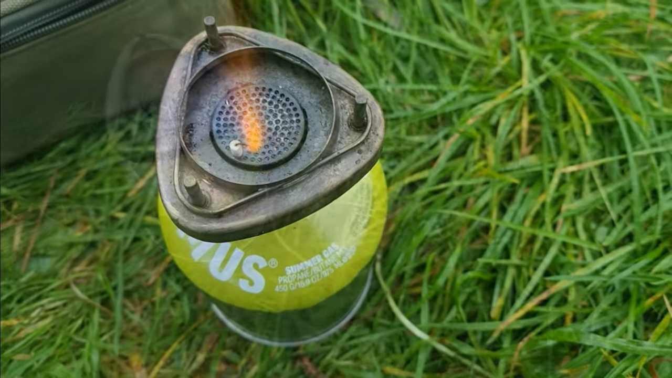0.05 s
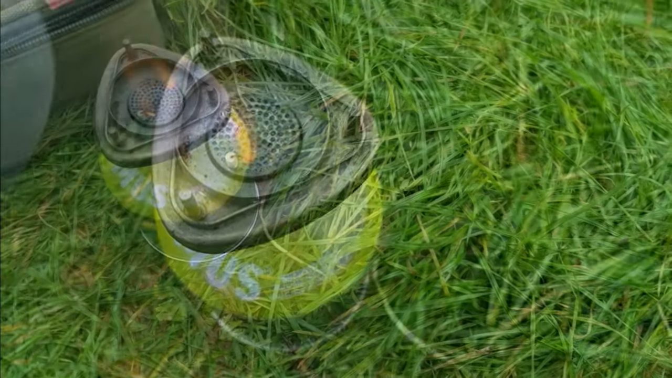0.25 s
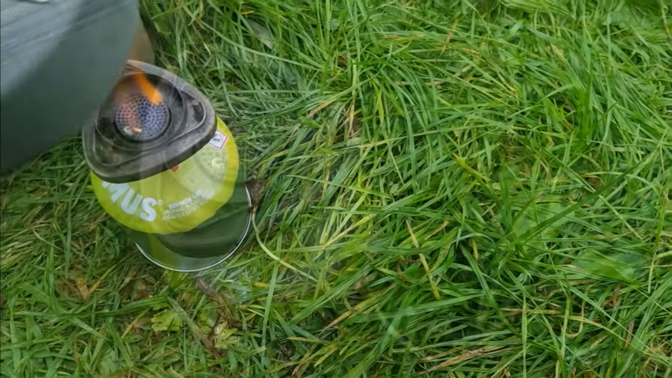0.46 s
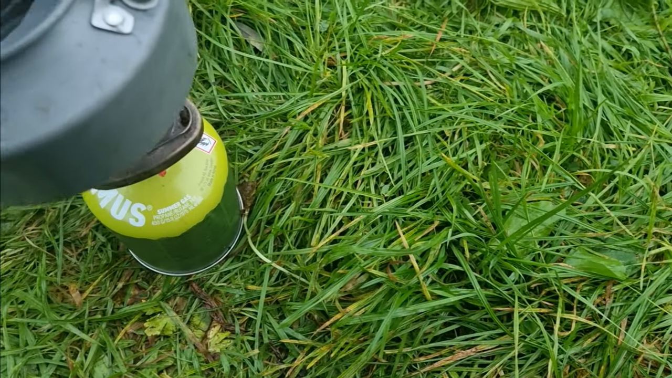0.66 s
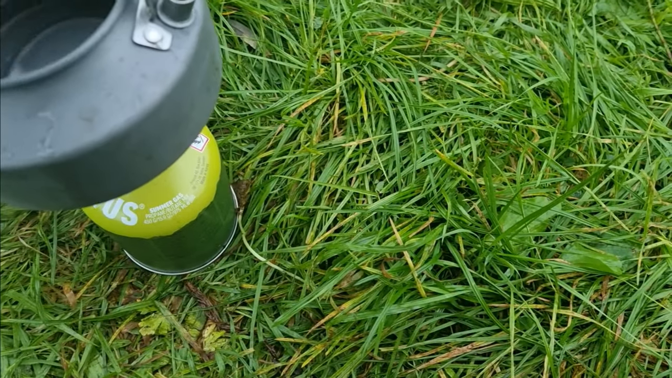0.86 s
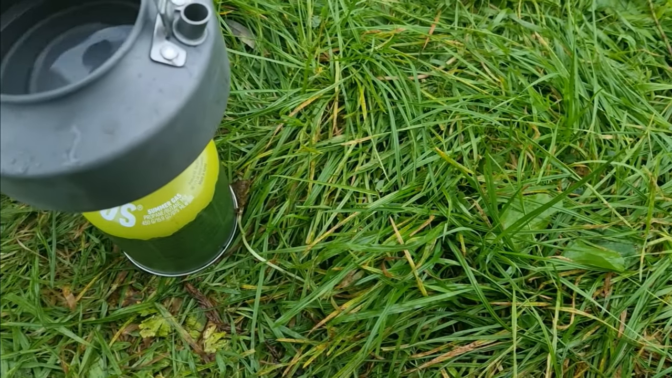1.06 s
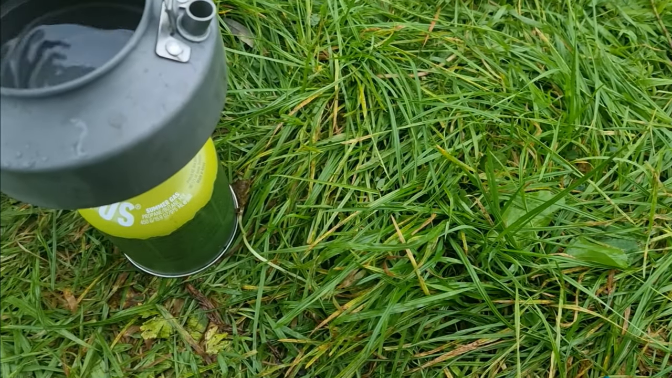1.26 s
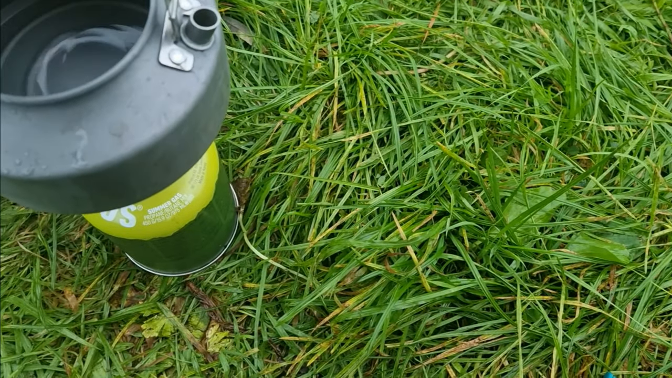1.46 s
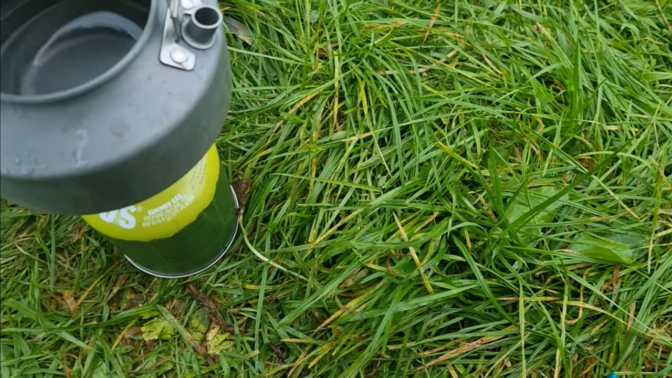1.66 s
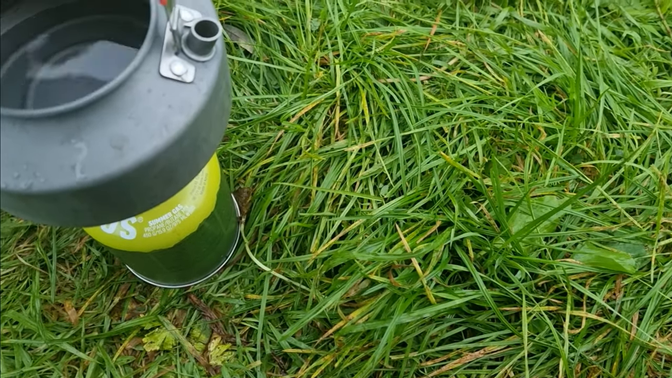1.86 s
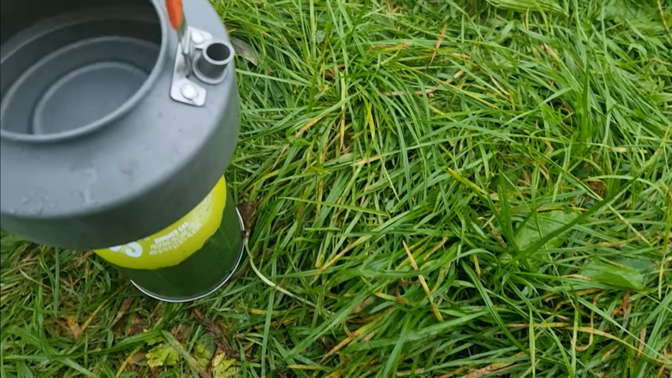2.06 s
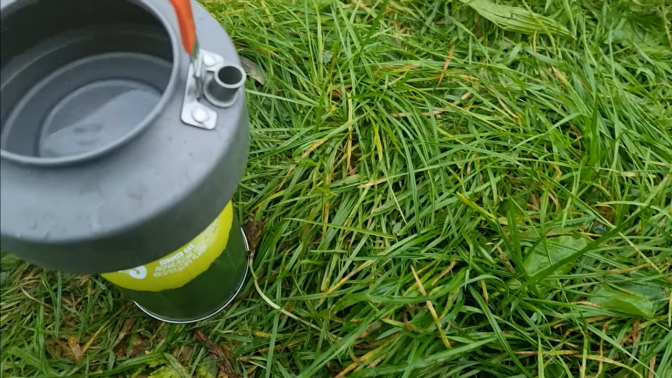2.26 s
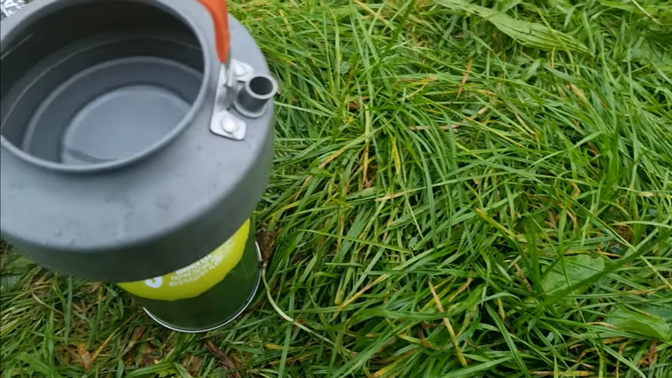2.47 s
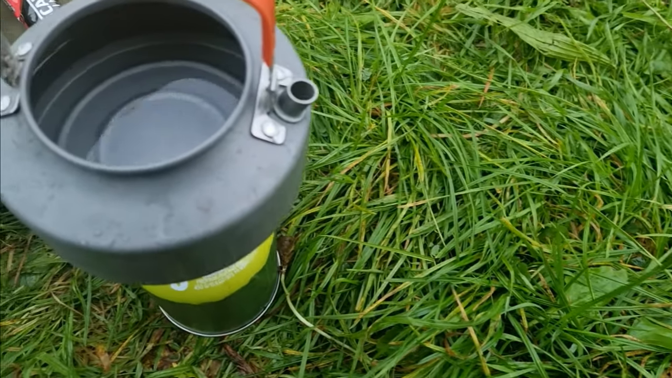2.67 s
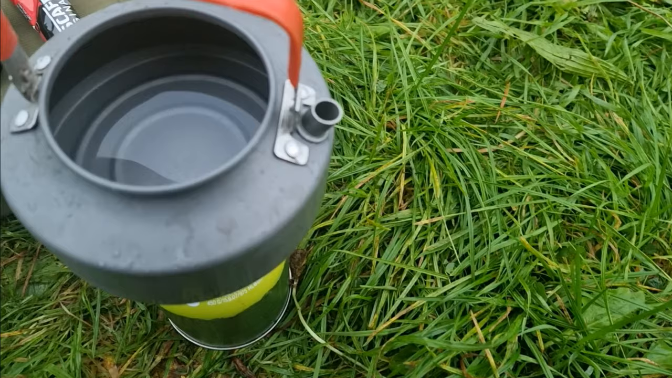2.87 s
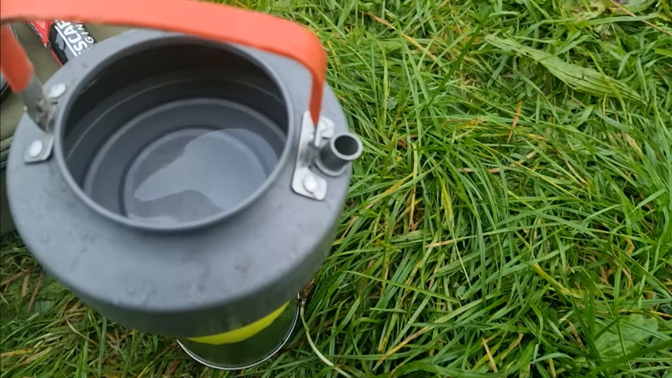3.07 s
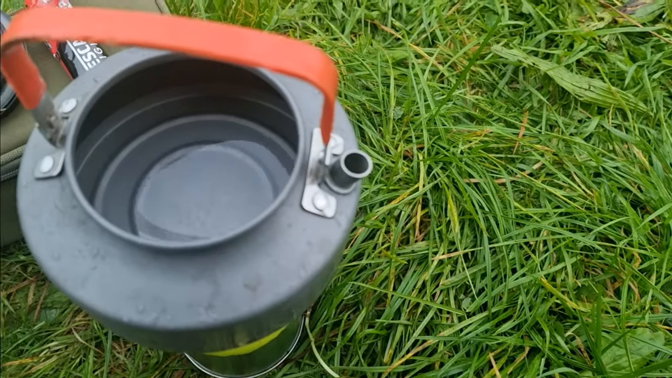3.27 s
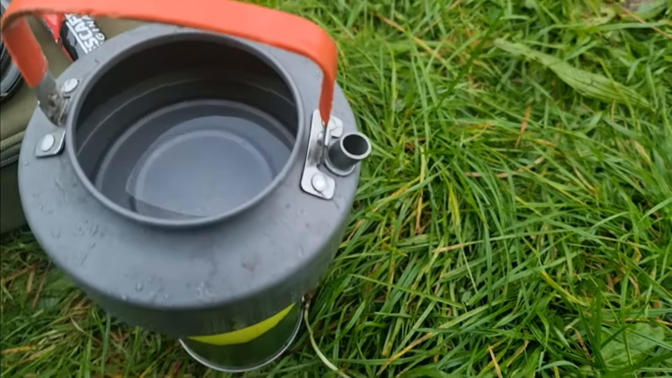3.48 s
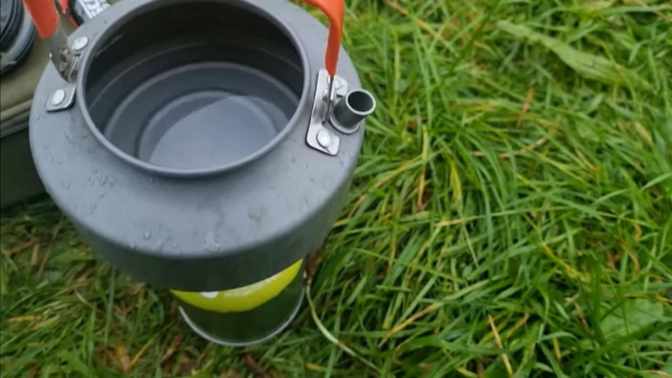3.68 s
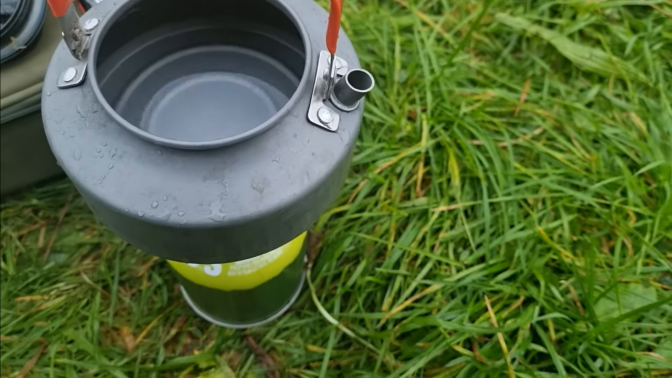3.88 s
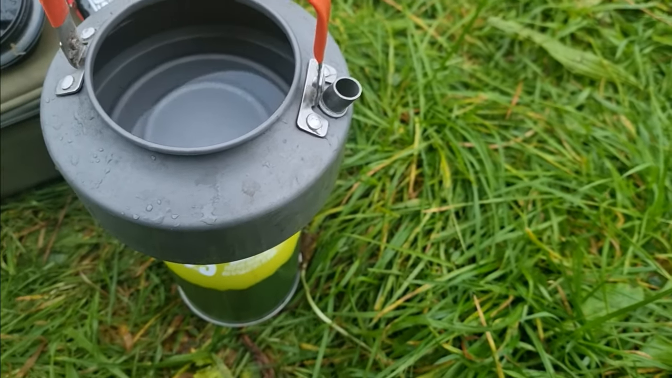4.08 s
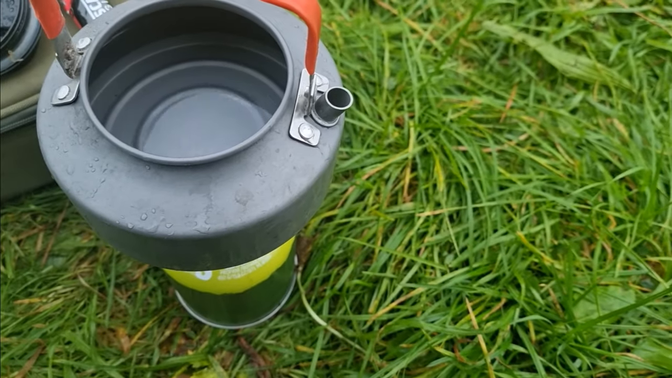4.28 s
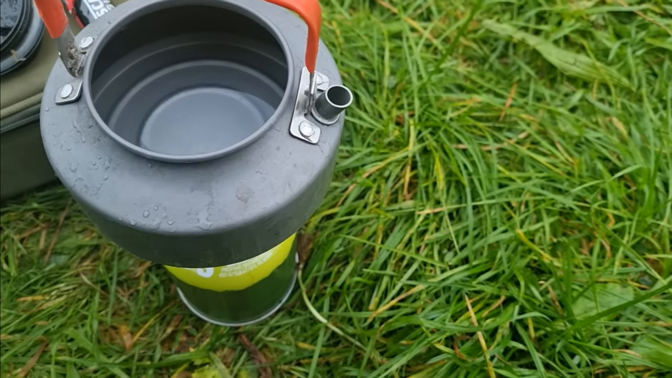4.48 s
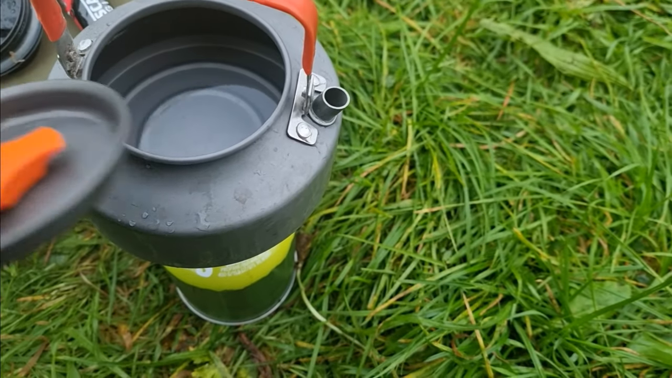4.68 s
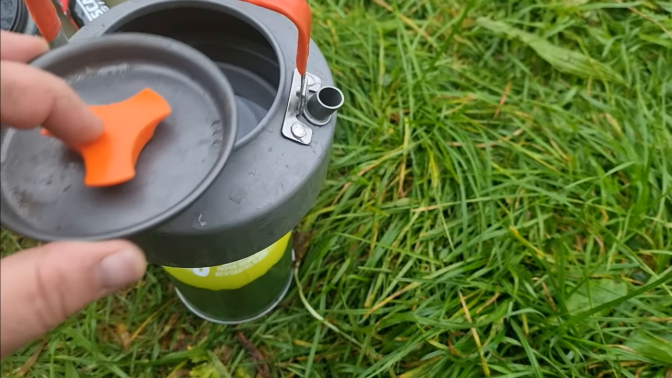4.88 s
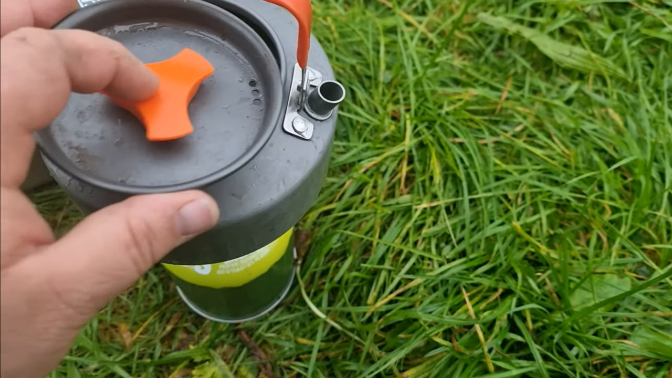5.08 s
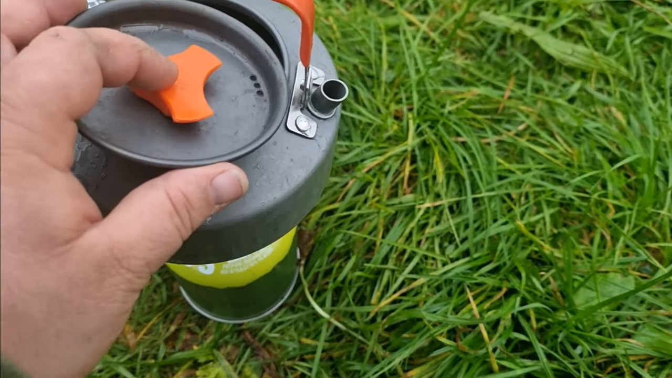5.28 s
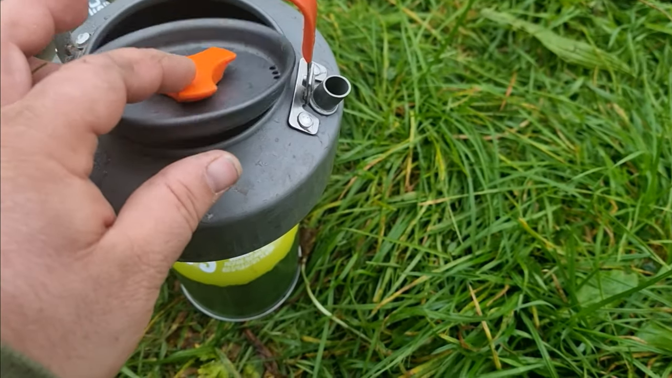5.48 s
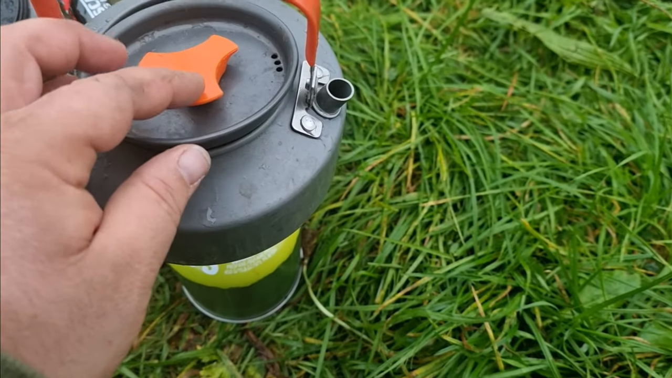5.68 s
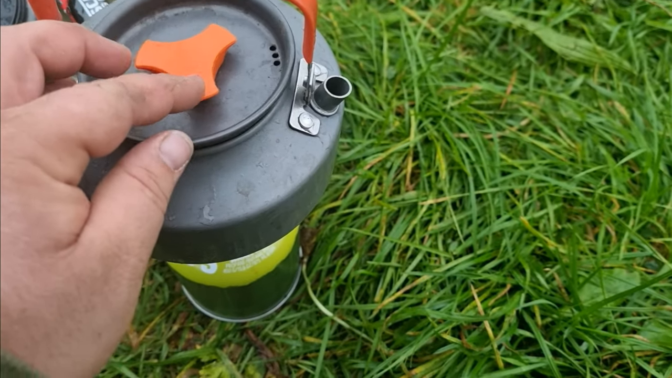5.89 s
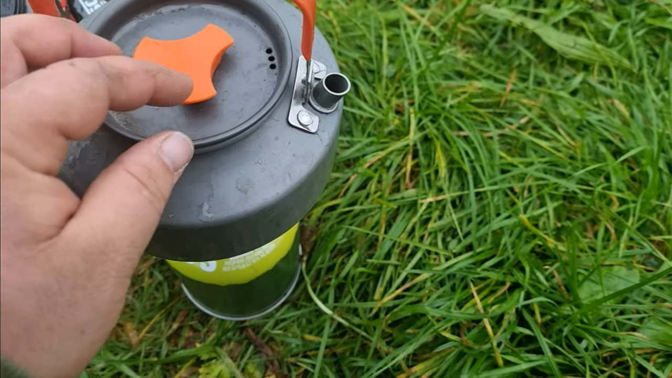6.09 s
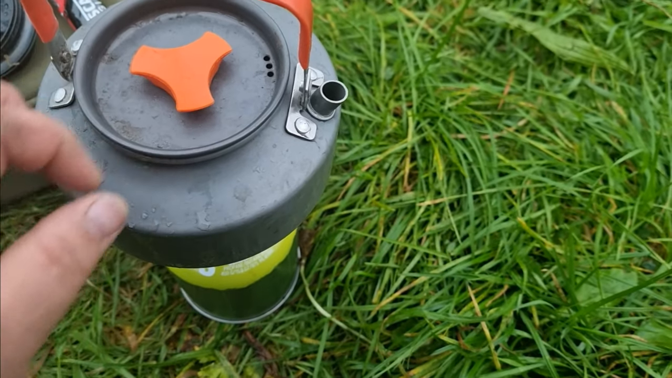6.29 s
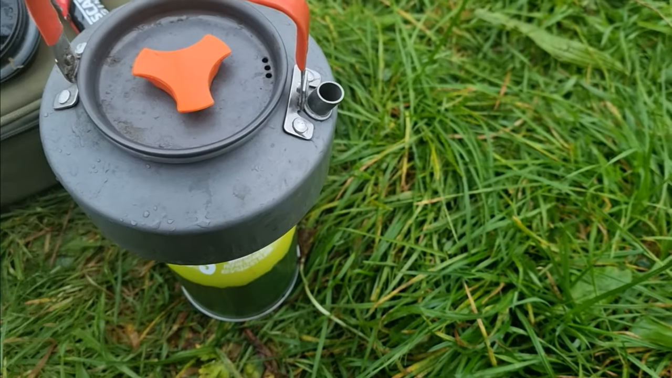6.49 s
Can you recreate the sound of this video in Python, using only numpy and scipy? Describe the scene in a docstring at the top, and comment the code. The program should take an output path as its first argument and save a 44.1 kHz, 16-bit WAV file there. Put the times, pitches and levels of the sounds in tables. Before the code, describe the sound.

A small camping gas stove burns with a steady, airy hiss over a faint low flutter of flame. A metal kettle of water is set on it with a short ringing clunk and nudged into place, and the hiss changes colour as the burner is covered. After a few faint ticks, the thin lid rattles, scrapes round the rim and is pressed home with sharp clacks. It is heard close up, outdoors, without echo.

```python
"""A camping gas stove burns on grass: its turbulent jet hisses through the resonances of the burner
tube, over the low flutter of the flame. A kettle of water is set on the pan supports and nudged into
place; the impacts excite its modes, it screens the hiss, and the warming metal ticks. Later its thin
lid is put on, rattles and rubs round the rim and is pressed home, while the air inside rings lower
as the mouth closes."""
import sys
import numpy as np
from scipy import signal
from scipy.fft import rfft, irfft
from scipy.io import wavfile
from scipy.ndimage import uniform_filter1d

SR = 44100
rng = np.random.default_rng(int(sys.argv[2]) if len(sys.argv) > 2 else 0)


def digitize_waveform(pressure):
    """Quantize a signal to 16-bit integers and store it at the path in sys.argv[1].

    Rows of a 2-D input are taken as channels; values are limited to [-1, 1].
    """
    field = np.atleast_2d(pressure).T
    bounded = np.clip(field, -1, 1)
    quanta = np.round(bounded * 32767).astype(np.int16)
    wavfile.write(sys.argv[1], SR, quanta)


N = 288414
TIME = np.arange(N) / SR
FRAME_S = np.arange(N // 256 + 6) * 256 / SR
BIN_HZ = np.fft.rfftfreq(1024, 1 / SR)
RING_S = np.arange(SR // 2) / SR

# Levels are relative; pan_db is left over right.
# ticks of warming metal: start_s, level_db
WARMING_TICKS = [(3.286, -35), (3.445, -43), (3.577, -47)]
# strokes of the lid along the rim: start_s, end_s, first_db, last_db, pan_db, hoot_db
RIM_STROKES = [(5.256, 5.404, -60, -47, 9, 4), (5.427, 5.484, -39, -36, 8, -1),
               (5.471, 5.557, -16, -21, 3, -4), (5.552, 5.632, -22, -47.5, 8, 0.5),
               (5.865, 5.978, -39, -25.5, 6, -11), (5.96, 6.025, -17.5, -28, 16, -14)]
# the lid strikes the rim: start_s, level_db, treble_db, pan_db
LID_IMPACTS = [(5.2285, -1, -1, 1), (5.24, -10.5, -17.5, 7), (5.4765, 2.5, -2, 3), (5.497, -3, -11, 1),
               (5.502, -5, 3, 14), (5.51, -5.5, 14, 2), (5.5272, -2.5, 6, 15), (5.537, -9, 2, -5),
               (5.547, -4.5, -5, 4.5), (5.568, -19, -9, 4), (5.724, -27, 11, 6), (5.738, -25.5, 8.5, 9),
               (5.783, -22, -15, 8), (5.8847, -7.5, -6.5, 7), (5.966, 0, -12, 8), (5.972, 1.5, -9, 0),
               (5.984, 0, 2, -1), (5.989, -2.5, 2, 6), (6.008, 0, -2, 5.5)]
# damping by the fingers on the lid: time_s, decay_db_per_s
FINGER_DAMPING = [(5.25, 15), (5.6, 38), (5.9, 3), (6.0, 212)]
# the lid closes the kettle's mouth: time_s, closed_fraction
MOUTH_CLOSURE = [(5.38, 0), (5.48, 0.27), (5.53, .4), (5.58, 0.78), (5.78, 0.5), (5.9, 0.83), (5.97, 0.89)]
# the kettle meets the supports: start_s, level_db, scrape_db, pan_db, contact_s, low_modes_db
KETTLE_IMPACTS = [(1.0785, -3.5, 3, 2.5, 0.0023, -1), (1.0823, -11, -12, -31, 0.0022, 6),
                  (1.266, -6.5, -12, -3, 0.004, -33), (1.405, -28.5, -7, -9, 0.0047, -8),
                  (1.425, -18.5, -13, 1, 0.0082, -23)]
# the flame as the listener moves about: time_s, level_db
FLAME_ENVELOPE = [(0, -41.5), (.35, -47.5), (3.7, -48), (4.4, -46), (5.4, -50), (6.54, -52)]
# the jet as the listener draws back: time_s, level_db
JET_ENVELOPE = [(0, -32.5), (.4, -38), (1, -40), (1.4, -40), (3.6, -40), (4.3, -40.5), (4.9, -44),
                (5.12, -40.5)]
# direction of the stove: time_s, pan_db
JET_PAN = [(0, -4.5), (.3, -3), (.65, 8.5), (1.9, 8.5), (3.3, 5.5), (4.4, 5), (4.85, 9.5), (6.2, 10.5),
           (6.54, 7)]
# the kettle screens the burner: time_s, hidden_fraction
SCREENING = [(0, 0.14), (.6, 0.28), (1, 0.43), (1.3, 0.65), (1.85, 0.66), (2.3, 0.9), (3.3, 0.86),
             (3.55, .78), (4.1, 1)]
# the kettle's mouth passes near the listener and hollows the hiss: start_s, end_s, level_db
MOUTH_PASSES = [(0.202, 0.424, 3), (3.99, 4.35, -8), (4.589, 5.3, -14)]

# modes of the struck metal: pitch_hz, level_db, t60_s
LID_PARTIALS = [(1270, -19.5, 0.22), (1540, -28, 0.39), (2015, -16, 0.15), (2210, -34, 0.2),
                (2410, -38, 0.11), (2763, -2.5, 0.11), (2880, -14.5, 0.12), (2795, -6.5, 0.051),
                (3155, -9, 0.12), (3340, -30.5, 0.13), (3370, -15, 0.19), (3800, -31, 0.07),
                (4100, -12, 0.054), (4910, -23.5, 0.14), (5710, -10.5, 0.088), (6970, -24.5, 0.2)]
OPEN_BODY_PARTIALS = [(826, -30, 0.39), (1570, -36, 0.23), (2062, -24, 0.16)]  # the kettle answering the lid, mouth open
SHUT_BODY_PARTIALS = [(320.3, -34.5, 0.28), (362, -33.5, 0.14), (1547, -27.5, 0.17), (2065, -25, 0.15)]  # the same, lid seated
KETTLE_PARTIALS = [(791.7, -2.5, 0.12), (780, -16, 0.27), (818.5, -18, 0.13), (842, -13, .09),
                   (1105, -28, 0.049), (1110, -19.5, 0.13), (1277, -22.5, 0.1), (1600, -34.5, 0.54),
                   (1645, -16, 0.053), (1734, -8, 0.032), (2280, -27, 0.15), (3224, -16.5, 0.15)]  # the kettle on the supports

# resonances driven by noise: centre_hz, width_hz, level_db
RIM_BANDS = [(1480, 320, -11.5), (2040, 85, -5), (2730, 48, 4), (2940, 42, -12), (3110, 110, 2),
             (3370, 120, -6), (3860, 75, -19), (5490, 95, -10)]
CAVITY_BANDS = [(830, 150, 1.5), (1080, 70, -2), (1400, 130, 0.5)]  # air in and around the open kettle
NOZZLE_BANDS = [(6630, 690, -6.5), (6540, 430, -2), (9800, 620, -9)]
BURNER_BANDS = [(1581, 30, -8), (1914, 145, -7), (2527, 310, 3), (2908, 337, 0), (4064, 380, -8),
                (5280, 240, 1.5), (5590, 310, -2.5), (7200, 510, -13)]  # the tube and the gap under the kettle

# noise spectra: frequency_hz, density_db
CLACK_SPECTRUM = [(150, -46), (300, -20), (430, -34), (560, -1.5), (1000, -5.5), (2000, 2), (3000, 4),
                  (4000, -1.5), (4800, -6.5), (5800, -3.5), (7300, -4), (8500, -13.5), (11500, -15.5),
                  (13500, -11.5), (15700, -3)]
SCRAPE_SPECTRUM = [(150, -16.5), (450, -15.5), (750, -10), (1250, 8), (1420, -13.5), (1700, -17.5),
                   (1950, -6.5), (2300, -7.5), (3400, -3.5), (4700, -8.5), (7000, 1.5), (9500, -10),
                   (11500, -10), (15000, -7.5)]
FLAME_SPECTRUM = [(20, -36.5), (33, -17), (42, -7.5), (52, -7.5), (65, 2.5), (85, -3), (120, -8.5),
                  (200, -10), (300, -15.5), (420, -22), (650, -35), (1200, -46)]
BARE_JET_SPECTRUM = [(290, -42), (500, -7), (933, -21.5), (1210, -9), (2290, -7.5), (2610, -1.5),
                     (3290, -14), (3750, -11), (4530, -13.5), (6330, 1.5), (9090, -27), (9630, -31),
                     (10100, -27.5), (14200, -19), (16000, -34.5)]
SCREENED_JET_SPECTRUM = [(400, -27.5), (700, -14), (1100, -23), (1450, -31.5), (1800, -17), (3500, -21.5),
                         (4700, -23), (5300, -10.5), (7600, -9.5), (8300, -19), (9300, -22), (10400, -21),
                         (11500, -34), (12600, -23), (15700, -19.5)]
TICK_SPECTRUM = [(600, -36.5), (1300, 3.0), (3000, -4), (6000, -33)]
WOBBLE_SPECTRUM = [(25, -7), (60, -2.5), (200, -68)]
ROUGHNESS_SPECTRUM = [(200, -2), (900, -60)]
FLUTTER_SPECTRUM = [(3, -11), (12, -8.5), (40, -30.0), (200, -100)]

# likeness of left and right: frequency_hz, correlation
FLAME_COHERENCE = [(60, 0.89), (130, .9), (290, 0.68), (640, 0.075)]
BURST_COHERENCE = [(300, 0.6), (650, 0.24), (1300, 0.14), (3100, 0.1), (6000, 0.016)]
RUB_COHERENCE = [(600, 0.6), (1500, 0.21), (3100, 0.24), (6000, .05)]
JET_COHERENCE = [(1400, 0.034), (2700, 0.79), (5400, 0.25), (9000, 0.065)]
# acoustic shadow on the far side, deepest in the middle treble: frequency_hz, pan_factor
SHADOW = [(700, 0.036), (1400, 0.228), (2500, 1.23), (4000, 0.52), (5300, 1.05), (6500, 1.3),
          (7500, .5), (15000, .25)]


def gain_of(db):
    """Amplitude ratio of a level in decibels."""
    return 10 ** (np.asarray(db) / 20)


def unit_rms(x):
    """Normalisation to unit power."""
    return x / np.sqrt(np.mean(x ** 2) + 1e-20)


def at_hz(points, hz):
    """Linear interpolation over log frequency."""
    frequencies, values = np.transpose(points)
    return np.interp(np.log(hz + 1), np.log(frequencies), values)


def at_time(points, t):
    """Linear interpolation over time."""
    return np.interp(t, *np.transpose(points))


def pan(pan_db):
    """Constant-power panning: left and right gains."""
    pair = gain_of([pan_db / 2, -pan_db / 2]).reshape(2, -1)
    return pair / np.sqrt(np.mean(pair ** 2, axis=0))


def gate(t, start, end, fade_s):
    """Raised-cosine window: one from start to end, fading outside."""
    outside = np.clip(np.maximum(start - t, t - end) / fade_s, 0, 1)
    return np.cos(np.pi / 2 * outside) ** 2


def add(mix, start_s, sound):
    """Superposition of a stereo sound on the mix."""
    part = mix[:, round(start_s * SR):][:, :sound.shape[1]]
    part += sound[:, :part.shape[1]]


def noise(spectrum, coherence, size, treble_db=0):
    """Partially coherent stereo noise with a given spectrum and a treble shelf."""
    hz = np.fft.rfftfreq(size, 1 / SR)
    left, independent = rfft(rng.standard_normal((2, size)))
    likeness = at_hz(coherence, hz)
    right = likeness * left + np.sqrt(1 - likeness ** 2) * independent
    shelf = gain_of(treble_db * hz ** 2 / (hz ** 2 + 4000 ** 2))
    shape = unit_rms(gain_of(at_hz(spectrum, hz))) * shelf
    return irfft(np.array([left, right]) * shape, size)


def resonance_power(bands):
    """Power response of steep resonances, summed incoherently."""
    return sum(gain_of(db) ** 2 / (1 + ((BIN_HZ - hz) / (0.67 * width)) ** 2) ** 2
               for hz, width, db in bands)


def ring(modes, scatter_db, spread_hz, detune):
    """Damped free vibration; weight, tuning and left-right phase scatter more in the high modes."""
    hz, db, t60 = np.transpose(modes)[:, :, None]
    weight, phase, shift = rng.standard_normal((3, 2, len(modes), 1))
    spread = np.minimum((hz / spread_hz) ** 2, 2)
    waves = np.sin(2 * np.pi * hz * (1 + detune * spread * shift[0]) * RING_S + phase * spread)
    return np.sum(gain_of(db + scatter_db * weight * spread / 2 - 60 * RING_S / t60) * waves, axis=1)


def burst(spectrum, rise_s, t60_s, treble_db):
    """Modal overlap: the dense, brief modes of thin metal merge into noise whose top dies first."""
    crowd = noise(spectrum, BURST_COHERENCE, len(RING_S), treble_db) * (1 - np.exp(-RING_S / rise_s))
    top = signal.sosfiltfilt(signal.butter(2, 6500, "high", fs=SR, output="sos"), crowd)
    decay = gain_of(-60 * RING_S / t60_s)
    return (crowd - top) * decay + top * decay ** 2.1


def ticks():
    """Thermal expansion: the warming metal gives small dull ticks."""
    out = np.zeros((2, N))
    for start_s, db in WARMING_TICKS:
        add(out, start_s, gain_of(db) * burst(TICK_SPECTRUM, rise_s=0.00025, t60_s=0.025, treble_db=-5))
    return out


def cavity_tone(t, open_hz=822, shut_hz=547.6):
    """Helmholtz resonance: the air in the kettle rings lower as the mouth narrows."""
    pitch_hz = open_hz + (shut_hz - open_hz) * at_time(MOUTH_CLOSURE, t)
    return np.sin(2 * np.pi * np.cumsum(pitch_hz) / SR)


def lid_friction(grit_db=-16, rough_db=-3.0):
    """Uneven sliding friction drives the lid's resonances, with a hoot of the enclosed air below."""
    power = resonance_power(RIM_BANDS) + gain_of(grit_db + at_hz(CLACK_SPECTRUM, BIN_HZ)) ** 2
    rub = noise(np.column_stack([BIN_HZ + 1, 10 * np.log10(power)]), RUB_COHERENCE, N)
    hoot = noise(WOBBLE_SPECTRUM, RUB_COHERENCE, N)[0] * cavity_tone(TIME)
    rub *= gain_of(rough_db * noise(ROUGHNESS_SPECTRUM, RUB_COHERENCE, N)[0])
    out = np.zeros((2, N))
    for start_s, end_s, first_db, last_db, pan_db, hoot_db in RIM_STROKES:
        span = slice(round(start_s * SR), round(end_s * SR))
        stroke = rub[:, span] * pan(pan_db) + gain_of(hoot_db) * hoot[span]
        size = stroke.shape[1]
        envelope = gain_of(np.linspace(first_db, last_db, size)) * signal.windows.tukey(size, .2)
        add(out, start_s, stroke * envelope)
    return out


def lid(ring_db=-14, snap_db=-5, clack_db=-9, tail_db=-25, air_db=-12, air_rise_s=0.0042,
        air_t60_s=0.045):
    """Impulse excitation: each blow rings lid, kettle and air; the fingers damp the lid and the puff."""
    out = np.zeros((2, N))
    for start_s, db, treble_db, pan_db in LID_IMPACTS:
        damping = gain_of(-np.maximum(at_time(FINGER_DAMPING, start_s), 0) * RING_S)
        shut = at_time(MOUTH_CLOSURE, start_s)
        metal = gain_of(ring_db) * ring(LID_PARTIALS, scatter_db=6.0, spread_hz=1970, detune=0.0018)
        snap = gain_of(snap_db) * burst(CLACK_SPECTRUM, rise_s=.0001, t60_s=.008, treble_db=treble_db + 4)
        clack = gain_of(clack_db) * burst(CLACK_SPECTRUM, rise_s=0.0014, t60_s=0.08, treble_db=treble_db)
        tail = gain_of(tail_db) * burst(CLACK_SPECTRUM, rise_s=0.0022, t60_s=0.29, treble_db=-12)
        body = sum(share ** 4 * ring(modes, scatter_db=-4, spread_hz=2440, detune=0.0025)
                   for share, modes in [(1 - shut, OPEN_BODY_PARTIALS), (shut, SHUT_BODY_PARTIALS)])
        puff_db = air_db + 0.82 * db  # the puff grows more slowly than the blow
        puff = gain_of(puff_db - 60 * RING_S / air_t60_s) * (1 - np.exp(-RING_S / air_rise_s))
        air = damping * puff * cavity_tone(start_s + RING_S)
        strike = damping * pan(pan_db) * (metal + snap + clack + tail)
        add(out, start_s, gain_of(db) * (strike + body) + air)
    return out


def kettle(scrape_db=-9, treble_per_db=0.18, cutoff_cycles=11.0):
    """Contact time limits bandwidth: long contacts ring the high modes less; hard ones scrape brighter."""
    out = np.zeros((2, N))
    hz, mode_db, t60 = np.transpose(KETTLE_PARTIALS)
    is_base = hz < 810  # the loaded base rings less once it rests on the supports
    for start_s, db, grit_db, pan_db, contact_s, low_db in KETTLE_IMPACTS:
        rolloff_db = 10 * np.log10(1 + (hz * contact_s / cutoff_cycles) ** 4)
        modes = np.column_stack([hz, mode_db + low_db * is_base - rolloff_db, t60])
        body = ring(modes, scatter_db=0.0, spread_hz=1890, detune=0.00181)
        body *= 1 - np.exp(-RING_S / contact_s)
        scrape = burst(SCRAPE_SPECTRUM, rise_s=contact_s / 2, t60_s=0.11, treble_db=treble_per_db * db)
        add(out, start_s, gain_of(db) * pan(pan_db) * (body + gain_of(scrape_db + grit_db) * scrape))
    return out


def flame(level_db=3, flutter_db=0.5):
    """Combustion noise: unsteady burning gives a low, fluttering rumble."""
    flutter = noise(FLUTTER_SPECTRUM, FLAME_COHERENCE, N)[0]
    envelope = gain_of(level_db + at_time(FLAME_ENVELOPE, TIME) + flutter_db * flutter)
    return noise(FLAME_SPECTRUM, FLAME_COHERENCE, N) * envelope


def burner_response(hidden, nozzle_db=19.5, screening_db=-29.5, cavity_rest_db=-33.5):
    """Resonant filtering: the bare hiss takes on the colour of tube and kettle as the burner is hidden."""
    passes = sum(gain_of(db) * gate(FRAME_S, start_s, end_s, fade_s=.22)
                 for start_s, end_s, db in MOUTH_PASSES)
    cavity = (gain_of(cavity_rest_db) + passes[:, None]) ** 2 * resonance_power(CAVITY_BANDS)
    nozzle = gain_of(nozzle_db + screening_db * hidden) ** 2 * resonance_power(NOZZLE_BANDS)
    tube = gain_of(at_hz(SCREENED_JET_SPECTRUM, BIN_HZ)) ** 2 + resonance_power(BURNER_BANDS)
    bare = gain_of(at_hz(BARE_JET_SPECTRUM, BIN_HZ))
    shape = np.sqrt(tube + nozzle + cavity) ** hidden * bare ** (1 - hidden)
    return shape / np.sqrt(np.mean(shape ** 2, axis=1, keepdims=True))


def reflection(hidden, depth=0.093, ground_m=0.26, kettle_m=0.52):
    """Comb interference from one echo, whose extra path shifts from the ground's to the kettle's."""
    path_m = ground_m + (kettle_m - ground_m) * hidden
    delay_s = path_m * np.array([1, 1.12])[:, None, None] / 343  # slightly longer on the right
    return 1 + depth * np.cos(2 * np.pi * BIN_HZ * delay_s)


def smoothed(field, frames, bins):
    """Moving average over time and frequency, at unit power."""
    return unit_rms(uniform_filter1d(uniform_filter1d(field, frames, axis=0), bins, axis=1))


def jet(level_db=2.0, shimmer_db=1.75, drift_db=2.5, hand_db=-7.5):
    """Turbulence radiates broadband noise, which shimmers quickly and drifts slowly in the treble."""
    hidden = at_time(SCREENING, FRAME_S)[:, None]
    real, imaginary, fields = rng.standard_normal((3, 2, len(FRAME_S), len(BIN_HZ)))
    spectra = real + 1j * imaginary
    shimmer = smoothed(fields[0], frames=12, bins=12)
    drift = smoothed(fields[1], frames=90, bins=8) * np.minimum(BIN_HZ / 6000, 1.3)
    likeness = at_hz(JET_COHERENCE, BIN_HZ)
    lag_rad = .5 + 2.5 * np.roll(drift, len(FRAME_S) // 2, axis=0)
    spectra[1] = (likeness * spectra[0] + np.sqrt(1 - likeness ** 2) * spectra[1]) * np.exp(-1j * lag_rad)
    pan_db = at_time(JET_PAN, FRAME_S)[:, None] * at_hz(SHADOW, BIN_HZ)
    spectra *= pan(pan_db.ravel()).reshape(spectra.shape)
    spectra *= burner_response(hidden) * reflection(hidden)
    spectra *= gain_of(shimmer_db * shimmer + drift_db * drift)
    hiss = unit_rms(signal.istft(spectra.swapaxes(1, 2), nperseg=1024, noverlap=768)[1][:, :N])
    hand = gate(TIME, 5.62, 6.22, fade_s=0.62)  # the hand with the lid shades the stove
    return hiss * gain_of(level_db + at_time(JET_ENVELOPE, TIME) + hand_db * hand)


def scene():
    """Stove and kettle superpose in the open air, without reverberation."""
    return jet() + flame() + kettle() + lid() + lid_friction() + ticks()


def record(dry, cutoff_hz=15800):
    """Soft saturation rounds the loudest peaks; a low-pass filter limits the band."""
    rounded = dry / (1 + dry ** 4) ** (1 / 4)
    lowpass = signal.firwin(511, cutoff_hz, window=("kaiser", 9), fs=SR)
    return signal.oaconvolve(rounded, lowpass[None], "same")


dry = scene()
out = record(dry)
digitize_waveform(out)
```